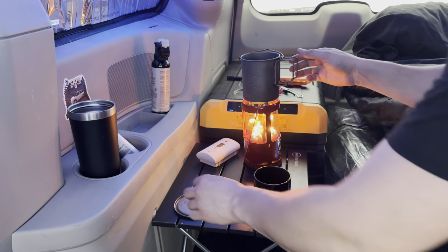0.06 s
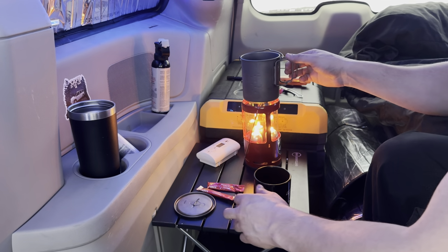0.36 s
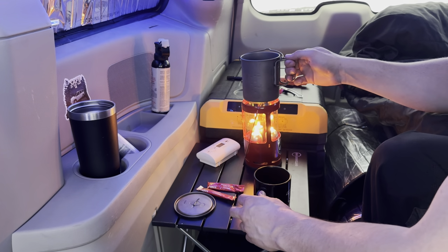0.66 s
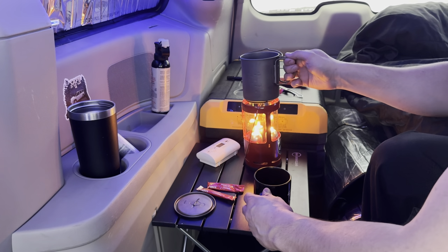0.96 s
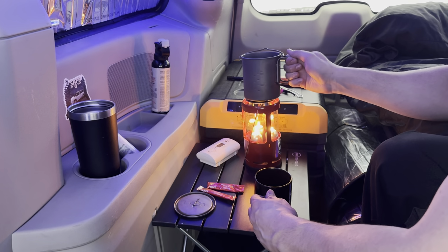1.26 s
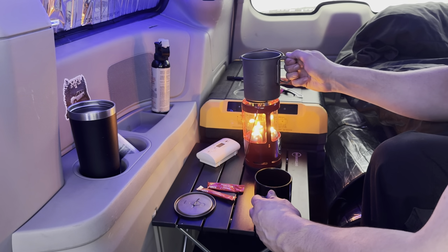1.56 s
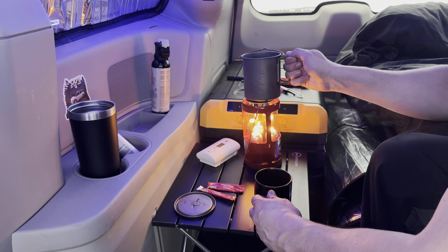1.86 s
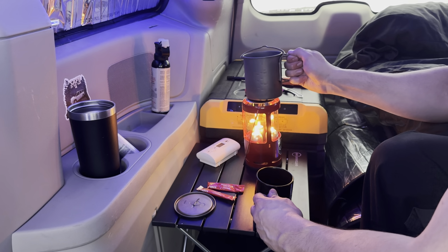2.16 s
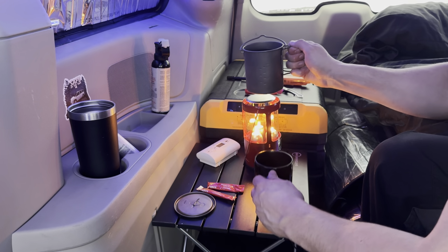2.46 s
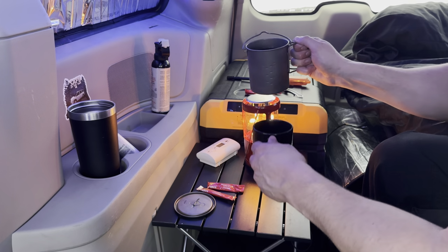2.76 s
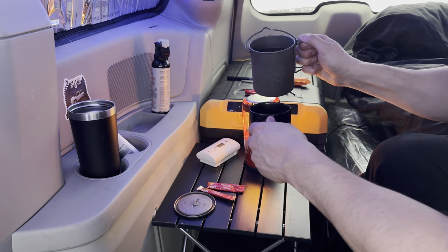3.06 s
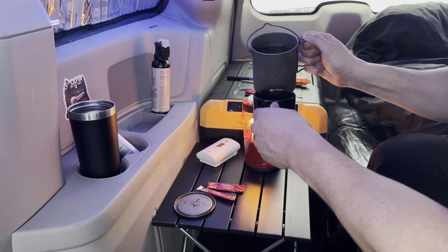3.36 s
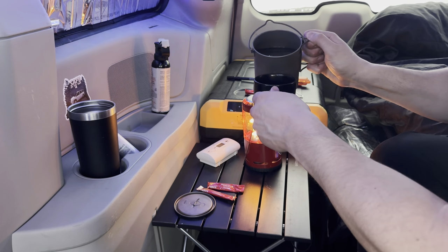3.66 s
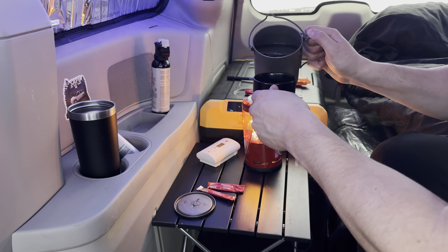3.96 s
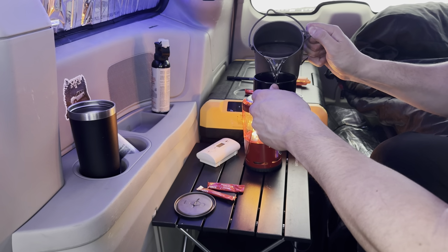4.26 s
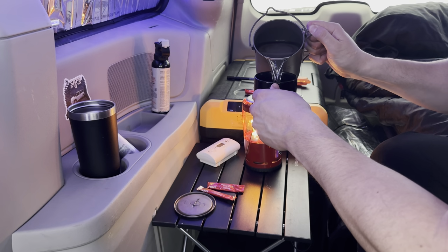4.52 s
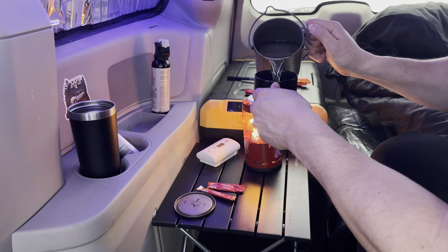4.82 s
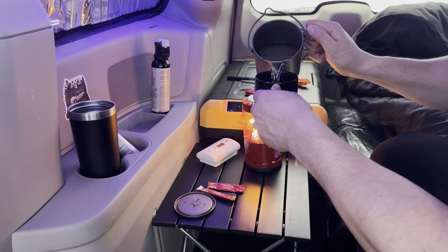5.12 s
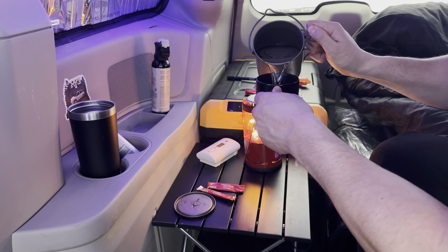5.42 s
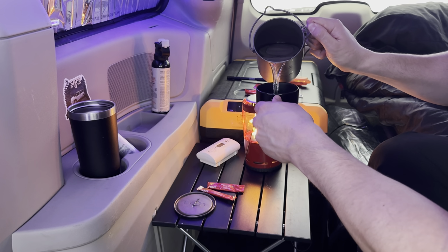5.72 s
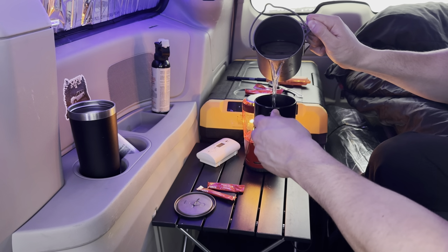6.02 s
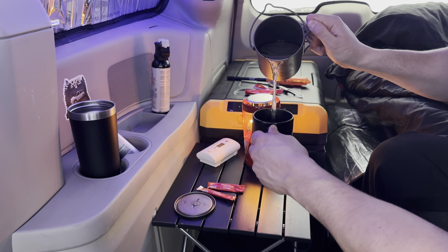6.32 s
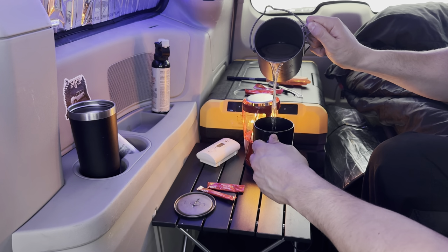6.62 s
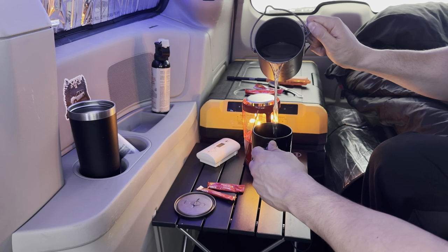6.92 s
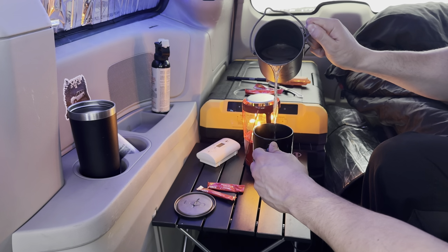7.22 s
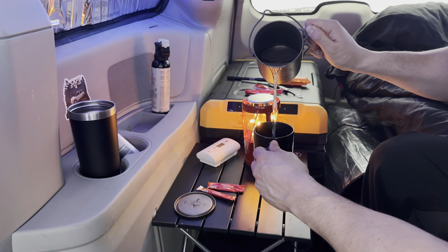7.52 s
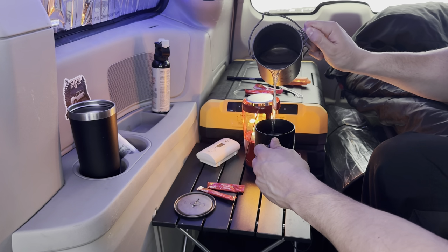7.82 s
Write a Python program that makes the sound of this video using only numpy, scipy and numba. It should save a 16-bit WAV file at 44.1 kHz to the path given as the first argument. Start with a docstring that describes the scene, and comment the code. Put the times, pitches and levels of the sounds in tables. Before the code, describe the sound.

Close stereo sound in a cramped, padded van, with a heater's low hum and soft rush of air underneath. First comes a sharp, ringing clatter of a metal lid on a table, followed by quiet dry scrapes of a mug and small handling taps. About halfway through, water from a pot spatters into the empty mug, then bubbles and splashes, rising in pitch and loudness to the end.

```python
"""Pouring hot water in a van

Close stereo microphone in a small padded van, heater humming. A metal lid clatters onto a slat table,
a mug is slid closer and a pot comes off its burner. Hot water runs into the mug: bubbles and splashes
ring the air above the water, whose pitch climbs as it fills; the pour grows louder as it falls further."""
import sys
import numpy as np
from scipy import signal
from scipy.fft import rfft, irfft, next_fast_len
from scipy.io import wavfile
from scipy.ndimage import map_coordinates
from numba import njit

SR = 44100
rng = np.random.default_rng(int(sys.argv[2]) if len(sys.argv) > 2 else 0)


def pcm_store(signal):
    """Save signal as 16-bit PCM."""
    levels = np.round(np.clip(np.atleast_2d(signal), -1, 1) * 32767)
    wavfile.write(sys.argv[1], SR, levels.astype(np.int16).T)


N = 356328

# resonances of the air in the filling mug: time_s, first_hz, second_hz
AIR_COLUMN = [(4.3, 720, 2900), (4.95, 975, 2840), (5.55, 980, 2930), (5.9, 1226, 3200), (6.45, 1270, 3340),
              (6.9, 1480, 3450), (7.3, 1626, 3310), (8.08, 1710, 3400)]
# spectrum of fine spray: frequency_hz, gain_db
SPRAY_SPECTRUM = [(1200, -9), (2100, -5.5), (2550, -3), (3400, -11.5), (4100, -7.5), (5100, -1.5),
                  (6500, -1.5), (9000, 3), (10500, -0.5), (13000, -3.5), (15200, -4), (16300, -16)]
# how far the stream falls; the mug is lowered halfway through the pour: time_s, height_cm
FALL_HEIGHT = [(4.4, 3.3), (5.65, 3), (6.1, 4.2), (6.4, 7), (6.65, 7), (7.0, 12), (8.05, 14)]
POUR_S, POOL_S = 4.36, 4.96  # water meets the bare bottom; a pool covers it
GURGLE_LAW, SPATTER_LAW = (-57, 3.76, -7.5), (-81, 4.6, 11)  # near_db, doubling_db, bare_db


def stream():
    """The stream drags air under: a gurgle that rings the mug's air column, and spurts of droplets."""
    # the gurgle's swells, strongest in the first shallow pool: time_s, gain_db
    gurgle_swells = [(4.9, -1), (5.0, 1.5), (5.25, 0), (5.5, 0.5), (5.75, -2), (6.3, 0), (6.7, -2.5),
                     (7.0, -1), (7.3, .5), (8.08, -2)]
    # the spray's swells, dipping where the stream runs smooth: time_s, gain_db
    spray_swells = [(4.95, 1), (5.35, -2), (5.68, -3.5), (5.8, 0), (5.95, -4), (6.3, 2.5), (7.05, 2),
                    (7.33, -1), (7.55, 3.5), (7.8, 1), (7.92, -9.5), (8.08, 3)]
    first_hz, second_hz = curves(AIR_COLUMN)
    churn = swarm(rate=900, hz=0.74 * first_hz, spread=0.47, cycles=13, scatter_db=3.5, rise=0.059)
    column = unit(resonate(churn, first_hz, width_hz=260))
    burble = swarm(rate=70, hz=first_hz, spread=0.13, cycles=28, scatter_db=2.5, rise=0.03)
    gurgle = unit(cabin(column + amp(-2) * burble + amp(-1) * churn, direct_db=-3))
    gurgle *= amp(pour_level(*GURGLE_LAW) + curves(gurgle_swells)[0])
    droplets = swarm(rate=620, hz=4200, spread=0.46, cycles=44, scatter_db=4.8, rise=0.05)
    # drops that trap little air only tick; the finest bubbles fizz as they burst
    spatter = swarm(rate=400, hz=5760, spread=0.6, cycles=8, scatter_db=8.5, rise=0)
    fizz = swarm(rate=1200, hz=13500, spread=0.12, cycles=9, scatter_db=4, rise=0)
    hollow = resonate(droplets + spatter, second_hz, width_hz=260)
    parts = [(fizz, pour_level(near_db=-89, doubling_db=6.5, bare_db=-2)),
             (coloured(droplets, SPRAY_SPECTRUM), pour_level(near_db=-70.5, doubling_db=2, bare_db=5.4)),
             (hollow, pour_level(near_db=-68, doubling_db=1.6, bare_db=-1.2)),
             (coloured(spatter, SPRAY_SPECTRUM), pour_level(*SPATTER_LAW))]
    spray = sum(unit(cabin(part, direct_db=-9.5, t60=0.092)) * amp(db) for part, db in parts)
    spray *= amp(curves(spray_swells)[0])
    # the falling stream breaks into lumps, which the spray follows more than the gurgle
    spurts = amp(1.7 * wobble(24))
    flowing = np.clip((np.arange(N) / SR - POUR_S) / 0.02, 0, 1)
    return (gurgle * np.sqrt(spurts) + spray * spurts) * flowing


def plops():
    """Large bubbles plink, some clean, some frothy; stray ones ring near the air column's pitch."""
    # the largest bubbles: start_s, level_db, pitch_hz, ring_cycles, froth_db
    large_bubbles = [(4.516, -42.5, 3080, 83, -5), (4.54, -48, 2890, 120, -10),
                     (4.789, -32.5, 1970, 91, -18), (4.841, -39.5, 2960, 100, -11),
                     (4.955, -34.5, 840, 36, -11), (5.03, -42, 1120, 25, -10), (5.116, -37, 995, 33, -9),
                     (5.115, -41.5, 2855, 130, -6), (5.215, -38.5, 910, 19, -14),
                     (5.244, -33.5, 980, 43, -19), (5.25, -54, 2930, 140, -14), (5.31, -49, 2830, 90, -14),
                     (5.441, -32.5, 950, 32, -19), (5.485, -52, 2990, 140, -11), (6.342, -37, 1170, 34, -8),
                     (6.695, -39, 1250, 35, -7), (7.048, -38.5, 1630, 35, -12), (7.341, -33, 1610, 48, -13),
                     (7.414, -33.5, 1595, 61, -18), (7.558, -31, 1600, 42, -16), (7.633, -34, 760, 39, -20),
                     (7.666, -33.5, 1660, 63, -16), (7.738, -43, 2470, 80, -18),
                     (7.793, -28, 1670, 39, -16), (7.847, -33, 1670, 46, -16), (7.896, -38, 1650, 50, -14),
                     (7.994, -37, 2600, 70, -7), (8.058, -34.5, 1630, 49, -14)]
    out, t = np.zeros((2, N)), np.arange(SR // 6) / SR
    chance = strays(POOL_S, pour_level(*GURGLE_LAW) + 13, curves(AIR_COLUMN)[0], spread=0.21, count=9)
    lesser_bubbles = [(s, db, hz, 28, -8) for s, db, hz in chance]
    for s, db, hz, cycles, froth_db in list(large_bubbles) + lesser_bubbles:
        ring = unit(bubble(t, hz, cycles, rise=0.03, swell=1.6))
        froth = amp(froth_db) * cluster(t, hz, spread=0.14)
        add(out, s, cabin(ring + froth, direct_db=2, t60=0.07), db - 3.5, pan_db=-2)
    return out


def splats():
    """A lump of the stream slaps the pool and tears a whole cluster of bubbles under at once."""
    # lumps of water: start_s, level_db, pitch_hz, log_pitch_spread
    lumps = [(4.637, -39, 1990, 0.14), (4.677, -40.5, 2250, 0.31), (4.954, -42.5, 2840, 0.2),
             (5.441, -38, 1240, 0.3), (5.55, -46, 2650, 0.068), (5.767, -42, 3400, 0.17),
             (5.791, -45.5, 3300, 0.043), (5.837, -46.5, 3400, 0.071), (6.34, -40.5, 1400, 0.32),
             (6.811, -38, 2720, 0.37), (6.874, -38, 1750, 0.12), (6.973, -34.5, 2020, 0.35),
             (7.04, -34.5, 1490, 0.28), (7.097, -41, 850, 0.12), (7.327, -33.5, 2120, 0.27),
             (7.393, -37, 1410, 0.4), (7.633, -32.5, 1427, 0.28), (7.755, -34, 1070, 0.5),
             (7.793, -34, 1390, 0.31), (7.848, -37, 1270, 0.11), (8.009, -34, 2600, 0.58),
             (8.056, -32.5, 1600, 0.69)]
    out, t = np.zeros((2, N)), np.arange(SR // 8) / SR
    for s, db, hz, spread in lumps:
        add(out, s, cabin(cluster(t, hz, spread), direct_db=-2.5, t60=0.074), db - 4.5, pan_db=0)
    return out


def splashes():
    """Each drop snaps on the surface and traps a tiny chirping bubble."""
    # the hardest drops: start_s, level_db, pitch_hz, snap_db
    hard_drops = [(4.367, -45, 5120, -0.5), (4.4014, -47, 4950, -7), (4.6792, -45.5, 4370, 3),
                  (4.9534, -41, 6300, 0), (4.9724, -46.5, 5770, 8.5), (5.439, -49.5, 4400, 10),
                  (6.2678, -48.5, 6500, 1.5), (6.34, -45.5, 3630, 5), (6.4522, -44, 4760, 3),
                  (6.4914, -42, 7040, 4), (6.6827, -41, 5340, 7), (6.7388, -42, 4700, 0),
                  (6.8099, -38, 3390, -2), (6.893, -40, 9460, 0), (6.9727, -40.5, 3235, 0.5),
                  (7.06, -32, 9340, 0), (7.1083, -43, 9450, -6), (7.2808, -38, 9300, 4.5),
                  (7.3924, -37.5, 9600, 1), (7.4265, -36.5, 3580, 6), (7.4859, -40.5, 7700, 2),
                  (7.5343, -39.5, 4960, 3.5), (7.6106, -44, 7400, 6), (7.8451, -42.5, 9330, -1),
                  (7.9025, -39.5, 6820, -18.5), (7.93, -43.5, 8700, -9), (7.9663, -41.5, 9340, 7),
                  (8.008, -36, 8690, -1)]
    out, t = np.zeros((2, N)), np.arange(SR // 6) / SR
    chance = strays(POUR_S, pour_level(*SPATTER_LAW) + 17.5, np.full(N, 6100), spread=0.32, count=12)
    lesser_drops = [(s, db, hz, 0) for s, db, hz in chance]
    for s, db, hz, snap_db in list(hard_drops) + lesser_drops:
        snap = amp(snap_db) * burst(t, tilted(SPRAY_SPECTRUM, db_per_octave=1), t60=0.0086)
        ping = unit(bubble(t, hz, cycles=43, rise=0.1, swell=3.2))
        add(out, s, cabin(snap + ping, direct_db=-7.5, t60=0.077), db + 0.5, pan_db=-1.5)
    return out


def lid():
    """Every contact of the rim cracks on the slats and adds its energy to the ring of the thin metal."""
    # the rim rattling to rest: start_s, level_db
    hits = [(0.0, -12.5), (0.008, -17), (0.02, -24), (0.031, -29)]
    # the lid's modes: pitch_hz, level_db, t60_s
    modes = [(1136, -3, 0.11), (1383, 3, 0.091), (1703, 3.5, 0.115), (2124, 4, 0.08), (2247, 3, .08),
             (2350, -9, 0.17), (2880, -5.5, 0.37), (2980, -1, .08), (3170, 1.5, 0.08), (3451, -5, .1),
             (4635, -2, 0.12), (4792, 8, 0.073), (5286, -18, 0.28), (6110, -3.5, 0.076), (6430, -5.5, 0.12),
             (7320, -17.5, 0.27), (7897, -10, 0.082), (8920, -9, 0.065)]
    # its many weak high modes: frequency_hz, gain_db
    shimmer_spectrum = [(1500, -15.5), (3000, -1.5), (5000, 1), (9000, -1.5), (16000, -18)]
    # rim on slat: frequency_hz, gain_db
    crack_spectrum = [(150, -23), (400, -8), (700, -1.5), (1300, -1.5), (2100, 5), (3900, -3), (5000, -1.5),
                      (9200, -7.5), (11500, -17), (16000, -24)]
    out, t = np.zeros((2, N)), np.arange(SR) / SR

    def fading(t60):
        return np.sqrt(sum((t >= s) * amp(db - 60 * np.abs(t - s) / t60) ** 2 for s, db in hits))

    ring = sum(amp(db) * fading(t60) * np.sin(2 * np.pi * (hz * t + rng.random((2, 1)) / 2))
               for hz, db, t60 in modes)
    shimmer = coloured(rng.standard_normal((2, len(t))), shimmer_spectrum) * fading(t60=1)
    out[:, :len(t)] = amp(-22.5) * ring + amp(-48) * shimmer
    for s, db in hits:
        crack = burst(t, crack_spectrum, t60=0.014)
        add(out, s, cabin(crack, direct_db=-7, t60=0.075), db - 0.5, pan_db=0)
    return out


def slides():
    """Mug and pot rub over table and burner in fine dry grains that ring their walls."""
    # each push speeds up and slows down: start_s, rise_s, fall_s, level_db, tilt_db_per_octave
    pushes = [(0.409, 0.041, 0.17, -63.5, 0), (0.784, 0.067, 0.078, -48, -0.5),
              (0.918, 0.051, 0.099, -50, -0.5), (1.0, 0.15, 0.35, -52.5, 0), (1.112, 0.015, 0.14, -54, 2.5),
              (1.925, 0.051, 0.067, -55.5, -1.1), (2.074, 0.052, 0.044, -54.5, -0.7),
              (2.144, 0.018, 0.047, -51, -1.5)]
    # dry friction: frequency_hz, gain_db
    rub_spectrum = [(400, 5.5), (700, 3.5), (1100, 1), (2000, -3), (2500, -7), (4500, -12), (7000, -16),
                    (9000, -16), (11500, -32), (14400, -27), (16000, -29.5)]
    # resonances of the vessels' walls: pitch_hz, width_hz, gain_db
    wall_modes = [(1530, 110, 5), (1930, 100, 9), (2960, 60, 10), (3940, 40, 4), (4500, 90, 4),
                  (5360, 110, 4), (5800, 46, 12)]
    out, t = np.zeros((2, N)), np.arange(SR) / SR

    def walls(hz):
        return 1 + sum(amp(db) / (1 + (2 * (hz - pitch) / width) ** 2) for pitch, width, db in wall_modes)

    for s, rise, fall, db, tilt in pushes:
        grains = rng.standard_normal((2, len(t))) * amp(2.5 * wobble(700)[:len(t)])
        rub = coloured(filtered(grains, walls), tilted(rub_spectrum, tilt))
        speed = np.interp(t, [0, rise, rise + fall], [0, 1, 0])
        out[:, round(s * SR):][:, :len(t)] += amp(db) * speed ** 1.28 * rub
    return out


def catches():
    """Now and then the mug's foot catches on a slat with a gritty chirr."""
    # the foot catching: start_s, peak_db, pitch_hz
    snags = [(.846, -45, 1140), (.866, -51.5, 2000), (2.128, -48.5, 2160), (2.172, -46.5, 1970)]
    out, t = np.zeros((2, N)), np.arange(SR // 5) / SR
    t60 = 0.074
    for s, db, hz in snags:
        grit = rng.standard_normal(len(t)) * amp(7.5 * wobble(500)[:len(t)] - 60 * t / t60)
        chirr = resonate(grit, np.full(len(t), hz), width_hz=550)
        add(out, s, cabin(chirr, direct_db=-1.5), db, pan_db=-2)
    return out


def taps():
    """Small dry ticks as the hands take hold of pot and mug; a firmer touch also knocks hollowly."""
    # touches on wire handles and mug: start_s, level_db, pan_db, knock_db, tilt_db_per_octave
    touches = [(.338, -46, 1.5, -17, 2.5), (1.401, -64, -5, -20, 5.5), (1.483, -57, -5, -21, 2),
               (1.526, -63.5, -5, -17, 4), (2.155, -59, -10, -12.5, -0.5), (3.601, -39.5, -1, 2.5, -0.7),
               (3.667, -54, 1, -5, -11.5)]
    # a light tick: frequency_hz, gain_db
    tick_spectrum = [(500, -25), (800, -6), (1600, -7), (2500, 1), (3300, -10.5), (4700, 1), (7000, -18),
                     (9500, -6), (12500, -17), (16000, -20.5)]
    # the hollow knock: pitch_hz, level_db, t60_s
    knock_modes = [(761, 4, .11), (1120, -6.5, .08), (2384, -7.5, .07), (2680, -11, .07)]
    out, t = np.zeros((2, N)), np.arange(SR // 5) / SR
    knock = unit(sum(np.sin(2 * np.pi * hz * t) * amp(db - 60 * t / t60) for hz, db, t60 in knock_modes))
    for s, db, pan_db, knock_db, tilt in touches:
        tick = burst(t, tilted(tick_spectrum, tilt), t60=0.0014)
        add(out, s, cabin(tick + amp(knock_db) * knock, direct_db=-27, t60=0.11), db + 3, pan_db)
    return out


def heater():
    """Behind it all, a slightly unsteady motor hum and fan whine over the rush of air."""
    # tones of motor and fan: pitch_hz, level_db, unsteady_db, pan_db, left_lead_rad
    tones = [(49.5, -64, 2.5, 0, 0), (74.24, -50, 0, 0, -0.25), (94.6, -56.5, 2.5, 0, 0),
             (126.6, -56.5, 3, 2, 0.28), (271, -72, 4.5, 2.5, 3), (436.8, -70, 2.5, 3, 1.7),
             (521.9, -68.5, 3.5, 3, 1), (539.3, -57.5, -0.06, 7.5, 1.76), (663, -72.5, 1.5, 7, 1.5)]
    # the low draught: frequency_hz, gain_db
    draught_spectrum = [(12, -41), (20, -15), (54, 0.5), (83, 2.5), (126, -6.5), (242, -14.5), (317, -17),
                        (416, -13), (481, -28.5), (536, -28.5), (597, -32.5), (653, -23), (1060, -38.5),
                        (1190, -23.5), (1500, -47), (1950, -71.5), (3300, -120)]
    # the hiss of moving air: frequency_hz, gain_db
    hiss_spectrum = [(400, -13), (600, -1.5), (800, 0), (1000, -7), (1250, -7.5), (1600, -10.5),
                     (2000, -21), (2800, -28), (3700, -33.5), (4400, -29), (7500, -36), (9200, -30),
                     (11500, -43.5), (14000, -43.5), (16000, -56)]
    t = np.arange(N) / SR
    out = amp(-48) * rush(draught_spectrum)
    out += amp(-63 + 0.27 * wobble(5.4)) * rush(hiss_spectrum)
    for hz, db, unsteady_db, pan_db, lead in tones:
        phase = 2 * np.pi * hz * t + 0.2 * unsteady_db * wobble(4) + np.array([[0.5], [-0.5]]) * lead
        out += np.sqrt(2) * amp(db + unsteady_db * wobble(6)) * panned(pan_db) * np.sin(phase)
    return out


def rush(spectrum):
    """Air noise of rms 1, alike left and right in the bass and diffuse in the treble."""
    # stereo width: frequency_hz, side_over_mid_db
    width = [(60, -17.5), (110, -15), (200, -3.5), (380, -7.5), (700, -0.5), (15000, -3)]
    mid, side = rng.standard_normal((2, N))
    side = shaped(side, width)
    return coloured(np.array([mid + side, mid - side]), spectrum)


def cabin(x, direct_db, t60=0.079):
    """Close padded walls: the direct sound and a short dense tail, different left and right."""
    # the padding swallows treble: frequency_hz, reflected_db
    padding = [(3000, 4), (8000, 1), (15000, -3)]
    t = np.arange(SR // 5) / SR
    tail = rng.standard_normal((2, len(t))) * amp(-60 * t / t60)
    response = shaped(tail / np.linalg.norm(tail[0]), padding)
    response[:, 0] += amp(direct_db)
    return signal.fftconvolve(x[None], response, axes=1)[:, :len(x)]


def bubble(t, hz, cycles, rise, swell):
    """An air pocket swells in and rings down, both in cycles; its pitch rises as it nears the surface."""
    age = t * hz / cycles
    phase = 2 * np.pi * hz * t * (1 + rise * (np.minimum(age, 1) - 0.5))
    return np.sin(phase) * amp(-60 * age) * (1 - np.exp(-(t * hz / swell) ** 2))


def swarm(rate, hz, spread, cycles, scatter_db, rise):
    """Small bubbles, rate a second, at random times and sizes round a pitch or pitch curve; rms 1."""
    count = int(rate * N / SR)
    start = rng.integers(0, N, (count, 1))
    detune = np.exp(spread * rng.standard_normal((count, 1)))
    pitch = np.clip(np.broadcast_to(hz, N)[start] * detune, 500, 15500)
    size = amp(scatter_db * np.minimum(rng.exponential(size=(count, 1)), 3))
    k = np.arange(SR // 40)
    waves = size * np.sqrt(pitch) * bubble(k / SR, pitch, cycles, rise, swell=1.6)
    return unit(np.bincount((start + k).ravel(), waves.ravel(), N)[:N])


def cluster(t, hz, spread, count=24, tear_s=0.007):
    """Short-lived bubbles torn off together round one pitch, the later ones weaker; rms 1."""
    late = rng.exponential(size=(count, 1))
    pitch = np.clip(hz * np.exp(spread * rng.standard_normal((count, 1))), 500, 15500)
    age = np.maximum(t - tear_s * (late - late.min()), 0)
    return unit(np.sum(np.exp(-late / 2) * bubble(age, pitch, cycles=15.6, rise=0.14, swell=0.57), 0))


def strays(from_s, level_db, pitch_hz, spread, count, scatter_db=5.5):
    """Chance events (start_s, level_db, pitch_hz); the longer the fall, the more often they come."""
    due = np.cumsum(curves(FALL_HEIGHT)[0] * (np.arange(N) / SR > from_s))
    at = np.searchsorted(due / due[-1], (np.arange(count) + rng.random(count)) / count)
    size, detune = np.clip(rng.standard_normal((count, 2)), -2, 2).T
    return list(zip(at / SR, level_db[at] + scatter_db * size, pitch_hz[at] * np.exp(spread * detune)))


def pour_level(near_db, doubling_db, bare_db, near_cm=3, pooling_s=0.021):
    """Level in dB: it grows with each doubling of the fall; bare_db is added until a pool forms."""
    fall_cm, = curves(FALL_HEIGHT)
    bare = 0.5 - 0.5 * np.tanh((np.arange(N) / SR - POOL_S) / pooling_s)
    return near_db + doubling_db * np.log2(fall_cm / near_cm) + bare_db * bare


def burst(t, spectrum, t60):
    """The fast-dying noise of an impact; rms 1."""
    return coloured(rng.standard_normal(len(t)) * amp(-60 * t / t60), spectrum)


@njit
def resonate(x, hz, width_hz):
    """A resonance of gain 1 whose centre follows hz."""
    y, z, keep = np.zeros(len(x)), 0j, np.exp(-np.pi * width_hz / SR)
    for i in range(len(x)):
        z = z * keep * np.exp(2j * np.pi * hz[i] / SR) + x[i]
        y[i] = 2 * (1 - keep) * z.real
    return y


def amp(db):
    return 10 ** (np.asarray(db) / 20)


def unit(x):
    return x / np.sqrt(np.mean(x ** 2) + 1e-20)


def along(points, hz):
    """Interpolate (frequency_hz, value) points on a log axis."""
    frequencies, values = np.transpose(points)
    return np.interp(np.log(hz + 1), np.log(frequencies + 1), values)


def curves(rows):
    """One value per sample for each column after the time."""
    times, *columns = np.transpose(rows)
    return [np.interp(np.arange(N) / SR, times, column) for column in columns]


def wobble(rate):
    """A smooth random curve, rate knots a second."""
    return map_coordinates(rng.standard_normal(int(N * rate / SR) + 4), [np.arange(N) * rate / SR])


def panned(pan_db):
    """Two gains, left over right by pan_db."""
    return amp(np.array([[0.5], [-0.5]]) * pan_db)


def filtered(x, response):
    """x through a gain that is a function of frequency."""
    n = x.shape[-1]
    padded = next_fast_len(n + 8192)
    return irfft(rfft(x, padded) * response(np.fft.rfftfreq(padded, 1 / SR)), padded)[..., :n]


def shaped(x, spectrum):
    """x through a (frequency_hz, gain_db) curve."""
    return filtered(x, lambda hz: amp(along(spectrum, hz)))


def coloured(x, spectrum):
    """x shaped by a spectrum, at rms 1."""
    return unit(shaped(x, spectrum))


def tilted(spectrum, db_per_octave):
    """A spectrum made brighter or duller."""
    return [(hz, db + db_per_octave * np.log2(hz)) for hz, db in spectrum]


def add(out, start_s, sound, peak_db, pan_db):
    """Mix a stereo sound in at a time, peak level and side."""
    sound = sound / np.abs(sound).max(1, keepdims=True) * amp(peak_db) * panned(pan_db)
    part = out[:, max(round(start_s * SR), 0):][:, :sound.shape[1]]
    part += sound[:, :part.shape[1]]


def scene():
    """The heater runs throughout; lid and mug are handled first, then comes the pour."""
    return heater() + lid() + taps() + slides() + catches() + stream() + plops() + splats() + splashes()


def record(dry, top_hz=16300):
    """Each microphone port has its own colour, and in one treble band the two oppose each other."""
    # what both ports share: frequency_hz, gain_db
    mid_response = [(1000, 0), (2000, -2), (9500, -0.5), (10600, -10), (11600, -19.5), (12600, -1.5),
                    (14000, 4)]
    # left port over right: frequency_hz, pan_db
    port_balance = [(400, 0), (700, 1), (1100, 3), (2400, -1.5), (4400, 5), (8100, -4.5), (13000, -1)]
    mid = shaped((dry[0] + dry[1]) / 2, mid_response)
    side = (dry[0] - dry[1]) / 2
    stereo = np.array([mid + side, mid - side])
    return filtered(stereo, lambda hz: panned(along(port_balance, hz)) * (hz < top_hz))


dry = scene()
out = record(dry)
pcm_store(out)
```